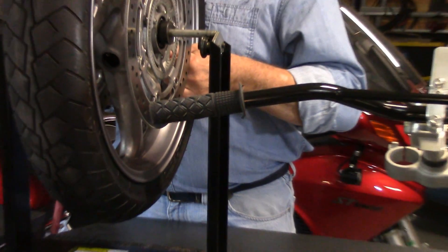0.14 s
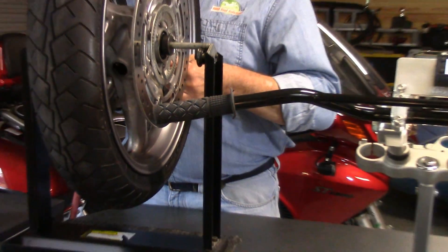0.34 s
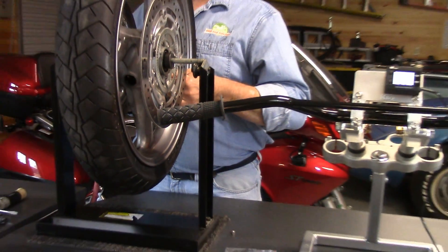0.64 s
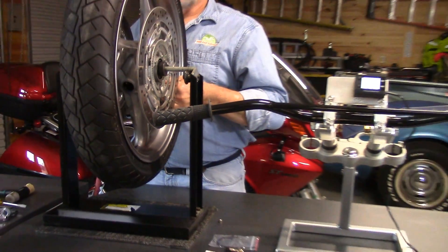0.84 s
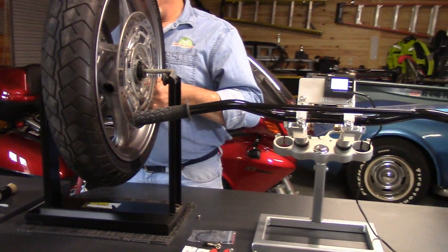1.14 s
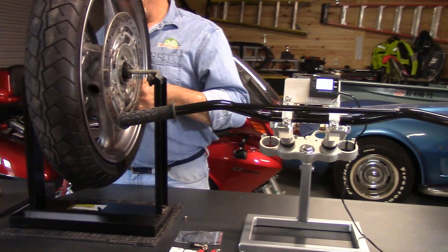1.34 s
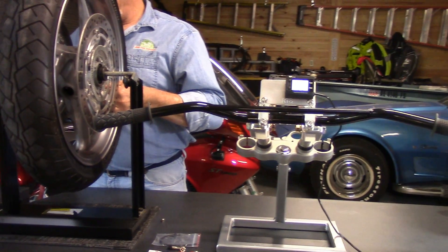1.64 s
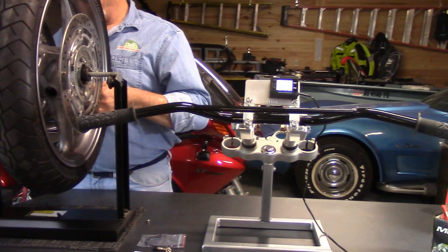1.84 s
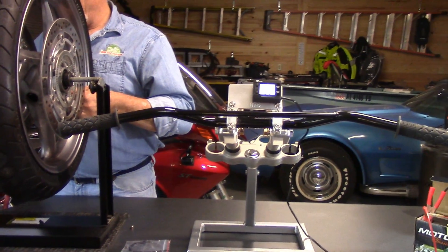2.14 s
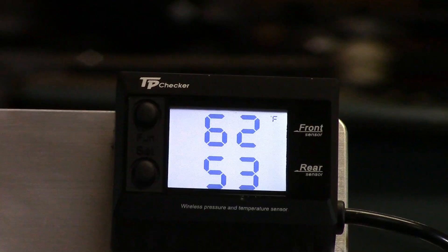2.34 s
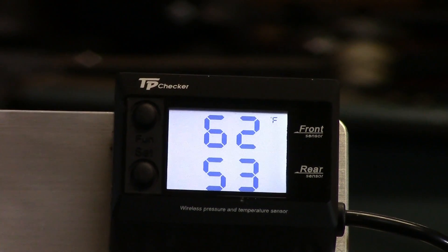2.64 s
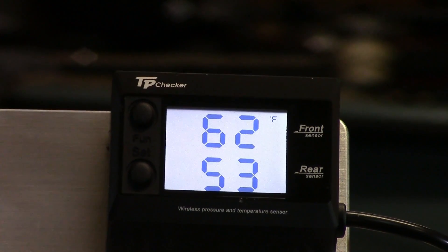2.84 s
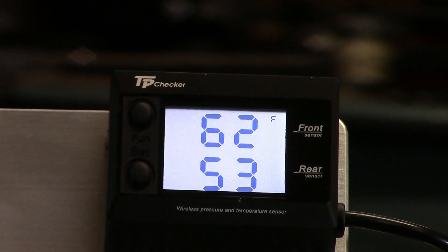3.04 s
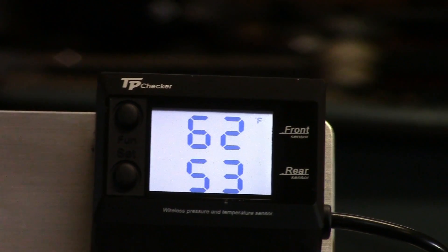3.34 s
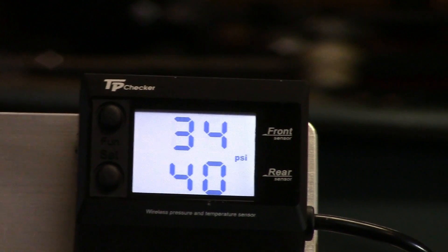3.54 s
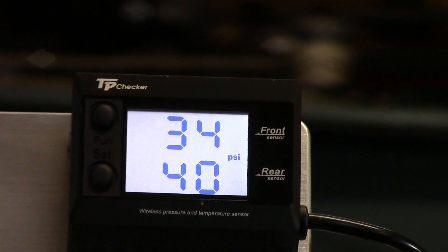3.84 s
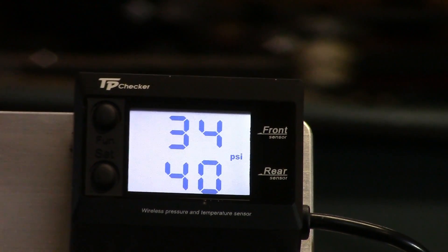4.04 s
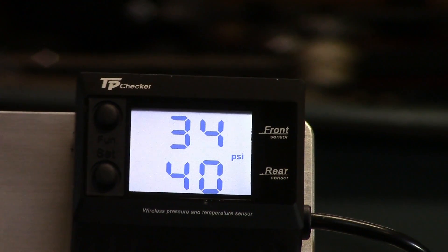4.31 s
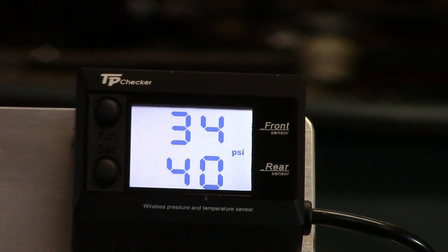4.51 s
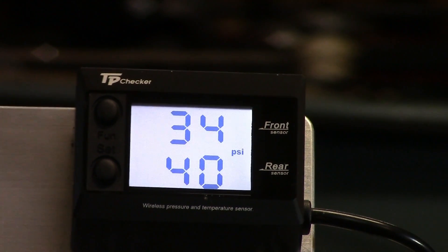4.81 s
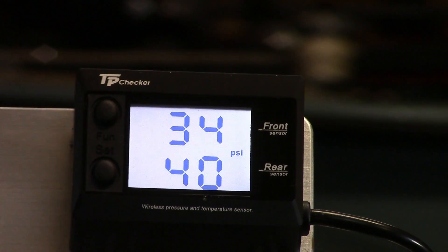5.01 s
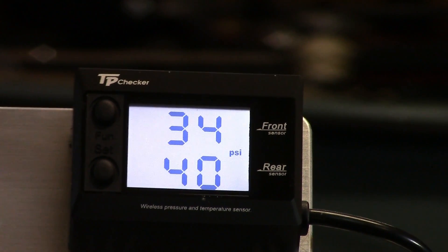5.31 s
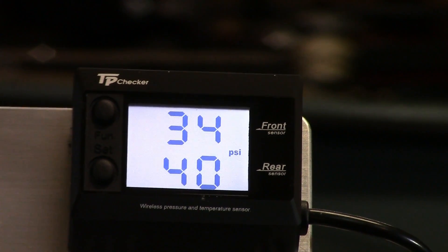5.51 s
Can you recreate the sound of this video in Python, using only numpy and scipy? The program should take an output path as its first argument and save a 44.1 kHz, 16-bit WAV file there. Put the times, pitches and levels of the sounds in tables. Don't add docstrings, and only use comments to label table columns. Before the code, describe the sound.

A strong, bright rush of air escapes a tire valve, with a few dull knocks, a short break midway, then continuous hissing again.

```python
import sys
import numpy as np
from scipy import signal
from scipy.fft import irfft, next_fast_len
from scipy.io import wavfile
from scipy.ndimage import uniform_filter1d

SR = 44100
rng = np.random.default_rng(int(sys.argv[2]) if len(sys.argv) > 2 else 0)


def decibels_to_gain(level_db):
    exponent = np.asarray(level_db, float) / 20
    return 10 ** exponent


def wav_out(sig):
    wavfile.write(sys.argv[1], SR, np.round(np.clip(np.atleast_2d(sig).T, -1, 1) * 32767).astype(np.int16))


N = 249899
T = np.arange(N) / SR
HZ = np.fft.rfftfreq(next_fast_len(N), 1 / SR)
CUT_S = 2.3655


def level(x, db):
    return x * decibels_to_gain(db) / np.sqrt(np.mean(x ** 2))


def coloured(gain):
    white = rng.standard_normal((2, len(HZ)))
    spectrum = gain * (white[0] + 1j * white[1])
    return irfft(spectrum, next_fast_len(N))[:N]


def walk(rate):
    hold = int(SR / rate)
    steps = np.repeat(rng.standard_normal(N // hold + 1), hold)
    return 1.3 * uniform_filter1d(uniform_filter1d(steps, hold), hold)[:N]


def columns(rows):
    s, *cols = np.transpose(rows)
    return [np.interp(T, s, c) for c in cols]


def resonate(modes, weights):
    power = np.zeros(len(HZ))
    for mode, weight in zip(modes, weights):
        hz, width_hz, db = mode[:3]
        detune = (HZ - hz) / (.78 * width_hz)
        power += weight * decibels_to_gain(2 * db) / (1 + detune ** 2) ** 2
    return coloured(np.sqrt(power))


def echoes(x):
    t60_s, echo_db, top_hz = .25, -14.5, 4000
    t = T[:SR // 2]
    tail = rng.standard_normal(len(t)) * decibels_to_gain(-60 * t / t60_s) * (t > .002)
    tail = signal.lfilter(*signal.butter(1, top_hz, fs=SR), tail)
    tail = tail / np.sqrt(np.sum(tail ** 2)) * decibels_to_gain(echo_db)
    return level(x + signal.fftconvolve(x, tail)[:N], 0)


def flow_db(opening, leak_db):
    return 20 * np.log10(np.hypot(np.clip(opening, 0, 1), decibels_to_gain(leak_db)))


def valve(jet_modes, share, rumble_modes, jet_db, rumble_db, share_db, top_db):
    gust_db = 0.2 * walk(30.) + .5 * walk(150.)
    top = np.array([m[0] >= 13800 for m in jet_modes])
    share = np.clip(share, 0, 1) * ~top
    jet = resonate(jet_modes, ~top * (1 - share)) * decibels_to_gain(.15 * walk(9.))
    jet += resonate(jet_modes, share) * decibels_to_gain(share_db + .25 * walk(8.3))
    jet += resonate(jet_modes, top) * decibels_to_gain(top_db)
    rumble = resonate(rumble_modes, np.ones(len(rumble_modes))) * decibels_to_gain(.3 * walk(9.))
    hiss = echoes(jet * decibels_to_gain(gust_db))
    return decibels_to_gain(jet_db) * (hiss + decibels_to_gain(rumble_db) * level(rumble, 0))


# f/Hz, width/Hz, level/dB per Hz, share that passes the hand [0-1]
WIDE_MODES = [(1205, 80, -13.5, 0.02), (1250, 240, -13.5, 0), (1480, 80, -10, 0.25),
              (1735, 268, -3.0, 0.05), (2000, 130, -6.5, 0.44), (2380, 180, -7.2, 0.3),
              (2520, 140, -6.5, 0.1), (2830, 440, -6, 0.27), (3270, 210, -8, 0.46), (3860, 580, -6, 0.5),
              (4240, 150, -11, 0.7), (4840, 460, -6.5, 1), (5130, 560, -6, 1), (5570, 470, -6.5, 0.3),
              (6550, 160, -2, 0.5), (6950, 790, 2.5, 0.05), (7640, 350, -4.0, 0.4), (8130, 380, -4.5, 0.9),
              (8700, 1100, -8, 0.8), (9350, 210, -7, 0.6), (10050, 440, -3, 0.3), (10560, 640, -1.5, 0),
              (10970, 180, -6.8, 0.1), (11940, 500, -13.5, 0.5), (12550, 450, -14.5, 0.9),
              (13570, 1220, -13.5, 0.2), (14520, 420, -19.7, 0.1), (15150, 160, -26.0, 0.1),
              (15580, 320, -25.9, 0.1)]
# f/Hz, width/Hz, level/dB per Hz
WIDE_RUMBLE = [(240, 41, -21), (373, 150, -18.5), (437, 54, -24), (535, 90, -17.5), (685, 610, -16.5),
               (1000, 31, -24.5)]
# t/s, level/dB (lift of the resonances it reflects)
HAND = [
    (0, 5),
    (.3, 4),
    (.4, 1.3),
    (1.0, -0.5),
    (2.0, -1),
    (2.25, -4.5),
    (2.36, -2),
]
# t/s, level/dB (rumble lift), decay/s
SHAKES = [
    (-.01, 9, 0.074),
    (.2, 6.5, 0.41),
    (.37, 3.5, .06),
]


def wide():
    full_db, closing_s, closing_shape, leak_db = -24, 0.43, 1.34, -25
    hand_db, = columns(HAND)
    shake_db = np.zeros(N)
    for s, db, dies_s in SHAKES:
        shake_db += db * np.exp(-np.maximum(T - s, 0) / dies_s) * (T > s)
    closed = np.clip(1 - (CUT_S - T) / closing_s, 0, 1) ** closing_shape
    weak_db = flow_db(1 - closed, leak_db)
    jet_db = full_db + 0.092 * hand_db + weak_db
    rumble_db = -48 + shake_db + .12 * weak_db
    top_db = -.4 * hand_db - .2 * weak_db
    passes_hand = [m[3] for m in WIDE_MODES]
    return valve(WIDE_MODES, passes_hand, WIDE_RUMBLE, jet_db, rumble_db - jet_db, hand_db, top_db)


# f/Hz, level/dB per Hz
GARAGE = [(25, 10), (60, 13), (120, -6), (200, -8), (350, -3), (600, -15), (2000, -60)]
# t/s, level/dB
CAVITY = [
    (0, -58.5),
    (.9, -56.5),
    (1.1, -70),
    (1.4, -80),
]


def garage():
    cavity_hz, wander_hz, wander_db = 226, 3.35, 1.2
    hz, db = np.transpose(GARAGE)
    tone = level(coloured(decibels_to_gain(np.interp(np.log(HZ + 1), np.log(hz), db))), -64)
    turns = np.cumsum(cavity_hz + wander_hz * walk(12.)) / SR
    hum = level(np.sin(2 * np.pi * turns), 0)
    hum *= decibels_to_gain(columns(CAVITY)[0] + wander_db * walk(14.6))
    self_noise = level(coloured(1 / (1 + (HZ / 14200) ** 20)), -53.5)
    return tone + hum + self_noise


# t/s, f/Hz (centre)
SIDE_PATCHES = [(0.064, 8900), (0.921, 14800), (1.18, 6730), (1.179, 12400), (1.179, 14800), (1.735, 11000),
                (1.875, 13800), (3.106, 4700), (3.106, 8250), (3.106, 13800), (3.198, 5000), (3.523, 5150),
                (3.523, 7550), (3.523, 10050), (4.475, 6300), (4.662, 5800), (5.01, 5150), (5.01, 10350),
                (5.149, 4670), (5.149, 15200), (5.591, 6300)]


def side_patches(heard):
    half, offset = 1024, 769
    width_hz, lowest_hz, patch_db = 1550, 4180, -4.5
    side = np.zeros(N)
    n = np.arange(2 * half) + .5
    hz = n[:half] * SR / (2 * half)
    cosines = np.cos(np.pi / half * np.outer(n + half / 2, n[:half]))
    fade = np.sin(np.pi * n / (2 * half))
    for s, centre_hz in SIDE_PATCHES:
        start = offset + half * (round((s * SR - offset) / half) - 1)
        span = slice(start, start + 2 * half)
        band = (np.abs(hz - centre_hz) < width_hz / 2) & (hz > lowest_hz)
        strength = np.std(((heard[0, span] * fade) @ cosines)[band])
        noise = cosines @ (rng.standard_normal(half) * band) * strength * 2 / half
        side[span] += decibels_to_gain(patch_db) * noise * fade
    return np.array([side, -side])


# t/s, level/dB (peak), first f/Hz, last f/Hz, decay/s (to -60 dB)
KNOCKS = [
    (.201, -33.5, 900, 288, 0.11),
    (2.148, -29, 1250, 320, 0.037),
    (2.239, -36, 700, 330, .04),
    (2.397, -43, 280, 246, 0.072),
]


def knocks():
    glide_s = 0.0014
    spoke_hz, spoke_t60_s, spoke_db = 1060, 0.032, -5
    rim_hz, rim_t60_s, rim_rise_s = 450, .35, 0.011
    out = np.zeros(N)
    for s, db, first_hz, last_hz, t60 in KNOCKS:
        t = np.maximum(T - s, 0)
        glide = (first_hz - last_hz) * glide_s * (1 - np.exp(-t / glide_s))
        out += decibels_to_gain(db - 60 * t / t60) * np.sin(2 * np.pi * (last_hz * t + glide))
        hard = (first_hz / spoke_hz) ** 2
        out += hard * decibels_to_gain(db + spoke_db - 60 * t / spoke_t60_s) * np.sin(2 * np.pi * spoke_hz * t)
        rim_db = 33 + 37.6 * np.log10(t60)
        rim = decibels_to_gain(db + rim_db - 60 * t / rim_t60_s) * np.sin(2 * np.pi * rim_hz * t)
        out += rim * (1 - np.exp(-t / rim_rise_s))
    return out


# f/Hz, width/Hz, level/dB per Hz
CLOSE_MODES = [(1260, 400, -12.5), (1230, 140, -11.0), (1480, 85, -7.5), (1680, 180, -0.4),
               (1950, 235, -5.0), (2026, 140, -7.0), (2390, 115, -6.5), (2588, 210, -2.5),
               (2846, 210, -4.5), (3230, 410, -7.0), (3580, 410, -9.0), (3910, 370, -6.5),
               (4200, 110, -13.5), (4800, 350, -3.5), (5680, 830, -5.5), (6440, 630, -3.0),
               (6870, 430, -1.5), (7360, 350, 0.3), (7910, 630, -2.0), (8970, 610, -7.4), (9600, 300, -9.5),
               (10130, 420, 0.2), (10740, 550, -0.3), (11370, 510, -6.0), (12320, 190, -11.1),
               (12670, 530, -7.5), (13520, 980, -17.3), (13920, 400, -15.7), (14830, 940, -16.7),
               (15550, 340, -18)]
# f/Hz, width/Hz, level/dB per Hz
CLOSE_RUMBLE = [(224, 81, -16.5), (314, 19, -9.5), (403, 97, -5), (538, 63, -5), (591, 27, -5.5),
                (700, 106, -8), (801, 48, -5.5), (906, 30, -14), (960, 250, -18)]


def close():
    opens_s, opening_s, opening_shape, leak_db = 2.375, 0.087, 1.44, -21.5
    full_db, sag_db, sag_s = -23.5, 2.13, 1.4
    build_db, build_s = 2.5, 0.1
    press_s, press_rise_s, press_db = 2.52, 0.092, 5
    against_jet_db, rest_db = -16, -54
    since_open = np.maximum(T - opens_s, 0)
    opening = 1 - np.exp(-(since_open / opening_s) ** opening_shape)
    weak_db = flow_db(opening, leak_db)
    jet_db = full_db + sag_db * np.exp(-np.maximum(T - press_s, 0) / sag_s) + weak_db
    jet_db = jet_db - build_db * np.exp(-since_open / build_s)
    loose_db = press_db * (np.clip((T - press_s) / press_rise_s, 0, 1) - 1)
    rumble_db = 20 * np.log10(np.hypot(decibels_to_gain(against_jet_db + loose_db), decibels_to_gain(rest_db - jet_db)))
    lows = [m[0] < 3000 for m in CLOSE_MODES]
    return valve(CLOSE_MODES, lows, CLOSE_RUMBLE, jet_db, rumble_db, -0.18 * weak_db, .3 * weak_db)


def scene():
    fade_s = np.where(T < CUT_S, .004, .012)
    gate = np.clip(np.abs(T - CUT_S) / fade_s, 0, 1)
    jet = np.where(T < CUT_S, wide(), close())
    mono = gate * (jet + garage() + knocks())
    return np.array([mono, mono])


def band_limit(x):
    return signal.sosfilt(signal.butter(12, 15720, fs=SR, output="sos"), x)


def record(dry):
    bass_cut = signal.butter(2, 164, "high", fs=SR, output="sos")
    heard = signal.sosfilt(bass_cut, dry)
    return band_limit(heard + side_patches(heard))


dry = scene()
out = record(dry)
wav_out(out)
```